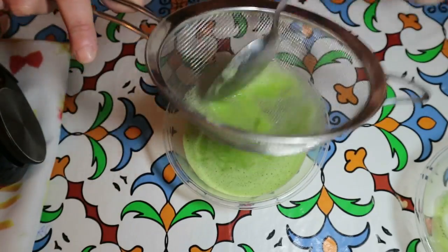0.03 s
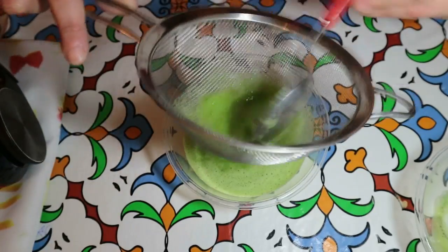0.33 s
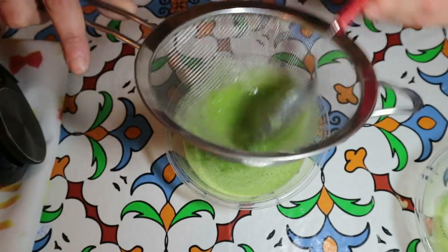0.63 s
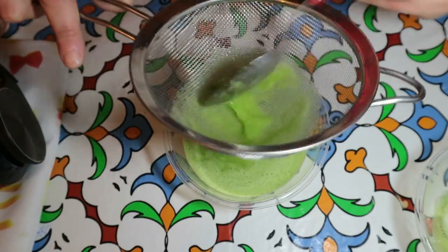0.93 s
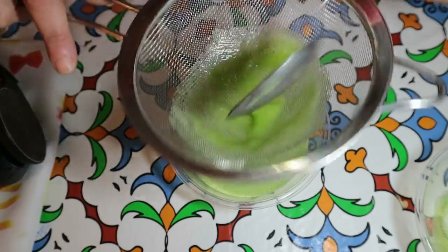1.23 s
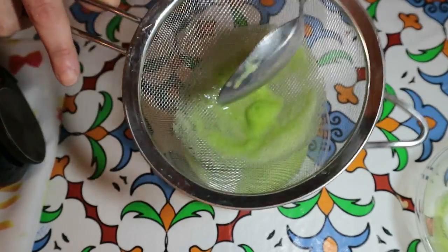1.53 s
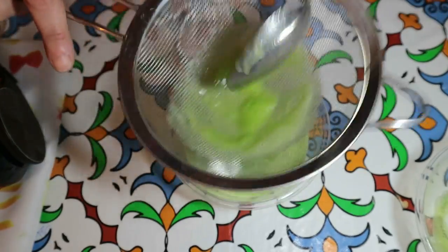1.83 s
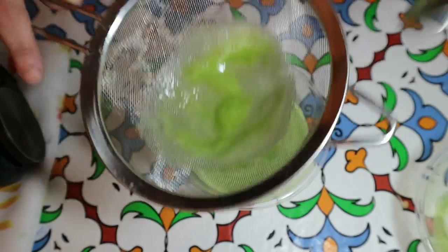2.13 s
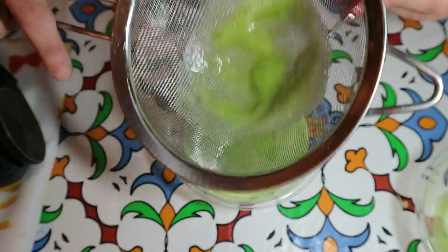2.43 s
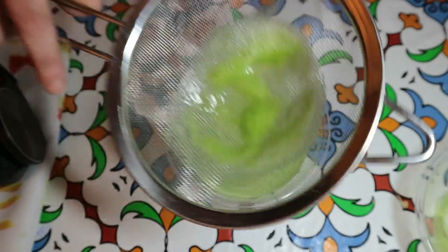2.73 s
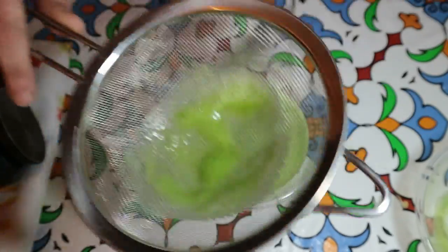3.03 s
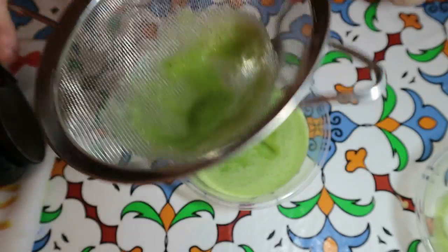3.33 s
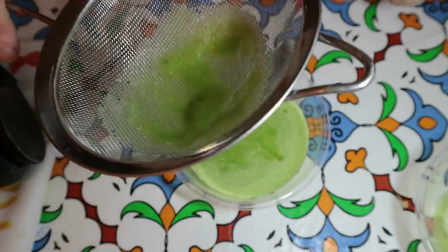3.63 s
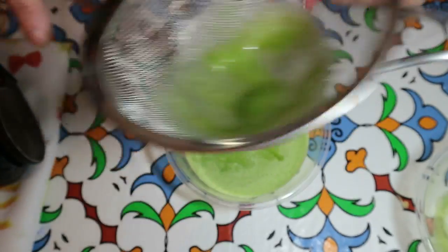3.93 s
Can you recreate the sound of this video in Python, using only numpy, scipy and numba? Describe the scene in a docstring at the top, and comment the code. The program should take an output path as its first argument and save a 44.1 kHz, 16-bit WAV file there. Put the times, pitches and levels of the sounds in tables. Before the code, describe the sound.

Close up in a small kitchen, a spoon scrapes a mesh strainer in short, zipping pushes. Four loud metal knocks follow, then a longer squeaky scrape and a few light ticks, while an appliance hums softly.

```python
"""Pushing pulp through a strainer

A metal spoon pushes wet pulp through a wire strainer in a small kitchen: quick strokes, four knocks
to shake the pulp off, then one long, squeaky scrape. The spoon's edge ticks over the wires at a rate
set by its speed and makes the mesh ring. An appliance hums; the volume dips after the knocks."""
import sys
import numpy as np
from scipy import signal
from scipy.fft import rfft, irfft
from scipy.io import wavfile
from scipy.ndimage import map_coordinates
from numba import njit

SR = 44100
rng = np.random.default_rng(int(sys.argv[2]) if len(sys.argv) > 2 else 0)


def generate_wav(sig):
    """Save sig (samples, or channels by samples) to the path in sys.argv[1] as 16-bit PCM at SR."""
    pcm = np.round(np.clip(np.atleast_2d(sig).T, -1, 1) * 32767).astype(np.int16)
    wavfile.write(sys.argv[1], SR, pcm)


N = 4 * SR
T = np.arange(N) / SR

# tone of a knock's crack, heard directly and off the walls (frequency [Hz], level [dB])
CRACK_COLOUR = [(200, -20), (800, -15), (1500, -4), (3200, 2.5), (4500, 1.5), (5600, -2), (7000, -6),
                (9400, -5), (11000, -11.5), (13000, -5), (16000, -13.5)]


def strokes():
    """Quick pushes of the spoon: pressure and speed rise and fall with each one."""
    # the pushes (fastest moment [s], rise [s], fall [s], level [dB], wires crossed [1/s])
    pushes = [(0.002, 0.015, 0.029, -17, 806), (0.113, .021, .031, -12.5, 1020),
              (0.241, .036, 0.032, -14, 1182), (0.353, 0.02, 0.029, -13.5, 900),
              (0.463, .013, 0.012, -16, 1500), (0.497, 0.015, 0.019, -25, 703.8),
              (0.577, .016, .029, -16.5, 742), (0.821, 0.0077, .014, -24.5, 804.6),
              (0.848, .011, .016, -19, 1090), (0.87, .009, 0.019, -21, 1607),
              (1.030, 0.0092, 0.011, -23.5, 1130), (1.051, 0.0099, .012, -21, 1099)]
    # the spoon lands on the mesh before a push (time [s], level [dB])
    landings = [(0.092, -35), (0.328, -20), (0.558, -18.5)]
    # ringing of the mesh and frame (frequency [Hz], width [Hz], level [dB])
    mesh_modes = [(900, 69, -9), (970, 15, -5.5), (1790, 40, 7), (1875, 70, -1.5), (2000, 30, -7),
                  (2300, 49, 0.5), (2440, 98, -1), (2688, 42, 4), (2870, 37, -3), (3154, 57, 5.5),
                  (3570, 61, 1.5), (9850, 350, -8)]
    # tone of the rubbing (frequency [Hz], level [dB])
    rub_colour = [(100, -21), (300, -9), (700, -2), (1300, -2.5), (1900, 1), (3300, -3.5), (4400, -8.5),
                  (6000, -13.5), (8000, -17.5), (9500, -18.5), (11500, -20.5), (15500, -21.5)]
    half_speed_s, landing_fade_s, rest_end_s = .034, .0076, .64
    presses = [undb(db) * bite(when, rise, fall) for when, rise, fall, db, _ in pushes]
    # the strongest push at each moment sets the speed
    peak_time, _, _, _, peak_rate = np.array(pushes)[np.argmax(presses, axis=0)].T
    speed = np.maximum(1 / (1 + ((T - peak_time) / half_speed_s) ** 2), .3)
    force, _ = rub(peak_rate * speed, spread_db=2)
    resting = undb(-34) * np.clip((rest_end_s - T) * 20, 0, 1)  # light touch between the first pushes
    landing = sum(undb(db) * (T > when) * np.exp(-np.abs(T - when) / landing_fade_s)
                  for when, db in landings)
    pressure = np.sqrt(np.sum(np.square(presses), axis=0) + resting ** 2 + landing ** 2)
    return pressure * mesh(force, mesh_modes, rub_colour)


def rub(wires_per_s, spread_db):
    """Each wire crossed gives a tick. Returns the ticks mixed with grit, and the tone of the crossings."""
    # second and third harmonic of the wire tone (level [dB])
    overtones = [-6, -8]
    grit_per_s = 3500
    crossed = np.cumsum(wires_per_s * (1 + .04 * wander(500))) / SR
    crossings = np.diff(np.floor(crossed), prepend=0)
    ticks = crossings * undb(spread_db * rng.uniform(-.95, 3.4, N)) / np.sqrt(wires_per_s)
    grit = (rng.random(N) < grit_per_s / SR) * rng.standard_normal(N)
    grit *= undb(spread_db * rng.uniform(-1.5, .8, N))
    flutter = undb(.6 * wander(210))  # the pressure shakes as the spoon catches
    force = (unit(ticks - ticks.mean()) + undb(4) * unit(grit)) * flutter
    tone = np.sin(2 * np.pi * crossed)
    for harmonic, db in enumerate(overtones, start=2):
        tone += undb(db) * wander(60) * np.sin(2 * np.pi * harmonic * crossed)
    return unit(force), np.sqrt(2) * tone


def mesh(force, modes, tint):
    """The mesh passes on all of the rubbing and also rings at a few drifting pitches."""
    shaking = undb(.5) * force + resonate(force, modes)
    return unit(colour(drifting(shaking), tint))


def zips():
    """Short gliding zips: lower ones are the spoon running over the wires, the highest the mesh ringing."""
    # (peak time [s], top pitch [Hz], level [dB], rise [s], fall [s], slide down [Hz/s])
    glides = [(0.106, 1020, -20.5, 0.0062, .007, 6000), (0.120, 1718, -18.5, 0.0061, .006, 5000),
              (0.122, 880, -19, .005, .014, 7700), (0.239, 1182, -19, 0.014, 0.025, 13170),
              (0.367, 850, -21.5, 0.0072, .014, 15660), (0.448, 820, -23.5, 0.0027, .012, 8000),
              (0.463, 1882, -17.5, 0.0051, .006, 4000), (0.467, 1510, -18, 0.0097, .004, 9967),
              (0.578, 1756, -19.5, .008, .014, 2000), (0.584, 659.5, -27.5, .004, .02, 7800),
              (0.848, 1107, -24.5, 0.0035, .007, 3000)]
    climb_hz_per_s = 20000
    jitter = 1 + .014 * wander(500)
    tones = np.zeros(N)
    for when, top_hz, db, rise, fall, slide in glides:
        slope = np.where(T < when, climb_hz_per_s, slide)
        pitch = np.maximum(top_hz - slope * np.abs(T - when), top_hz / 2)
        tones += undb(db) * bite(when, rise, fall) * sine(pitch * jitter)
    return tones


def knocks():
    """Each knock cracks, thuds and rings the rim. Returns the direct sound and what goes to the walls."""
    # knocks and small touches (time [s], level [dB], crack compared with thud [dB])
    hits = [(0.790, -19, -14), (0.816, -27, -19), (1.4092, 2, -24), (1.5582, 1.5, -3.5), (1.6994, 3, -2.5),
            (1.7066, -9, -7), (1.8431, 6, -3), (1.8499, -9, 0.5), (2.468, -12.5, -10.5), (2.482, -24, -10)]
    # the first contact and its tiny bounces (delay [s], level [dB])
    bounces = [(0, 0), (.00028, 3), (.00066, 5.5), (.0013, 0)]
    # ringing of the rim (frequency [Hz], level [dB], time to fade by 60 dB [s])
    rim_modes = [(2980, -39, .33), (3135, -40, .3)]
    # tone of the thud as it spreads to the walls (frequency [Hz], level [dB])
    thud_colour = [(200, -4), (600, 13.5), (1100, 25), (2600, 20.5), (3400, 18), (4800, 12.5), (7000, 1.5),
                   (14000, -20)]
    blows, bursts, contacts = np.zeros((3, N))
    for when, db, crack_db in hits:
        blows[int(when * SR)] = undb(db)
        bursts[int(when * SR)] = undb(db + crack_db)
        for delay, bounce_db in bounces:
            bounce_time = when + delay * rng.uniform(.8, 1.2)
            contacts[int(bounce_time * SR)] += undb(db + crack_db + bounce_db + 11)
    direct = crack(contacts, bursts) + thud(blows) + through(blows, ring(rim_modes))
    to_walls = undb(-5) * colour(blows, thud_colour) + undb(17.5) * colour(bursts, CRACK_COLOUR)
    return direct, to_walls


def crack(contacts, bursts):
    """Metal hits metal: sharp clicks and a short sizzle make the spoon ping."""
    # the spoon's ping (frequency [Hz], width [Hz], level [dB])
    ping_modes = [(3040, 190, 0), (7400, 600, -2.5), (9350, 660, 1.5)]
    sizzle = through(bursts, fade(T[:N // 10], t60_s=.01)) * rng.standard_normal(N)
    force = contacts + undb(2) * sizzle
    return colour(undb(-4) * force + resonate(force, ping_modes), CRACK_COLOUR)


def thud(blows):
    """The full strainer rings very briefly, and the table echoes it."""
    # ringing of the full strainer (frequency [Hz], level [dB], time to fade by 60 dB [s])
    strainer_modes = [(1034, -15.5, 0.026), (1280, 0, 0.007), (1528, -1, 0.007), (1953, -13.5, 0.024),
                      (2273, -5.5, 0.011), (3155, -7.5, 0.0096), (3840, -18, 0.002)]
    rise_s = .00029
    one_thud = ring(strainer_modes) * (1 - np.exp(-T[:N // 10] / rise_s))
    body = late(through(blows, one_thud), delay_s=.0004)  # the mesh gives way just after the contact
    table_echo = late(resonate(body, [(2350, 420, -3.5)]), delay_s=.00197)
    return body + table_echo


def long_scrape():
    """The spoon drags slowly over the mesh, then rubs through the wet pulp once more as it leaves."""
    # loudness of the drag and of the last rub (time [s], level [dB])
    drag_levels = [(2.47, -74), (2.525, -47.5), (2.556, -29), (2.62, -21.5), (2.656, -28), (2.70, -22),
                   (2.727, -25), (2.742, -19), (2.81, -21.5), (2.85, -48.5), (2.96, -43.5), (3.05, -62)]
    last_rub_levels = [(2.886, -48), (2.892, -31), (2.925, -30), (2.965, -50)]
    # tone of the drag and of the duller last rub (frequency [Hz], level [dB])
    drag_colour = [(100, -41), (300, -3), (550, -4), (950, -0.5), (1250, -5.5), (1600, -1), (3200, -3.5),
                   (4200, -10), (5500, -16), (8000, -19.5), (9500, -18.5), (11500, -21), (15500, -27)]
    last_rub_colour = [(300, -16), (900, 0.5), (1900, 2.5), (3600, -13), (15000, -30)]
    # speed of the spoon (time [s], wires crossed [1/s])
    speeds = [(2.54, 402.4), (2.61, 606.6), (2.66, 518.4), (2.72, 450), (2.755, 577.3), (2.775, 555.7),
              (2.8, 542.7), (2.84, 427), (2.91, 480)]
    # ringing of the mesh near the rim (frequency [Hz], width [Hz], level [dB])
    mesh_modes = [(980, 110, -5.5), (1440, 100, -3), (1770, 190, 0), (1960, 70, -12), (2400, 110, -3),
                  (2530, 150, -2.5), (2740, 110, -5), (3150, 120, -2), (3840, 91, -2)]
    force, wire_tone = rub(curve(speeds), spread_db=3.5)
    drag = swell(drag_levels) * (mesh(force, mesh_modes, drag_colour) + undb(-11) * wire_tone)
    last_rub = swell(last_rub_levels) * mesh(force, mesh_modes, last_rub_colour)
    return drag + last_rub


def squeak():
    """The spoon squeaks during the long scrape: a high, wobbly tone that comes in patches."""
    # loudness of the squeak (time [s], level [dB])
    levels = [(2.53, -56), (2.56, -39), (2.59, -26.5), (2.655, -32.5), (2.70, -30), (2.79, -35),
              (2.85, -47), (2.885, -56), (2.91, -45), (3.0, -62)]
    pitch_hz = 3213 + 58.7 * wander(110)
    patches = undb(6.5 * np.tanh(wander(130)))
    return swell(levels) * patches * sine(pitch_hz)


def lifting():
    """Soft, patchy rubbing as the strainer is lifted and tilted."""
    # loudness of the rubbing (time [s], level [dB])
    levels = [(3.05, -68), (3.17, -60.5), (3.28, -53.5), (3.40, -56.5), (3.48, -59.5), (3.56, -55),
              (3.68, -59), (3.79, -58), (3.86, -65), (3.99, -60)]
    # pitches it rings at (frequency [Hz], width [Hz], level [dB])
    modes = [(1310, 120, -8), (1770, 100, 3.5), (2160, 66, 2), (2450, 31, 7.5)]
    patches = undb(7 * np.tanh(wander(31)))
    rubbing = drifting(resonate(rng.standard_normal(N), modes))
    return swell(levels) * patches * unit(rubbing)


def light_taps():
    """Small touches make the wire frame tick and the spoon clink."""
    # touches on the frame and on the spoon (time [s], level [dB])
    frame_taps = [(0.9972, -19), (3.019, -36), (3.088, -33.5), (3.766, -40.5), (3.907, -39), (3.93, -39),
                  (3.972, -22.5)]
    spoon_taps = [(1.073, -41.5), (2.482, -40)]
    # how each rings (frequency [Hz], level [dB], time to fade by 60 dB [s])
    frame_modes = [(1810, -6, .016), (2050, -6.5, .012), (2590, -7.5, .012), (3200, -4, .012),
                   (3800, -9.5, .012), (4700, -19.5, .008), (8920, -14.5, .005)]
    spoon_modes = [(2000, 0, 0.14), (3060, 7, 0.1), (3531, -4.5, 0.15)]
    return strike(frame_taps, frame_modes) + strike(spoon_taps, spoon_modes)


def kitchen(direct, to_walls):
    """The treble reaches left and right unequally, and the walls throw the sound back."""
    # stereo width of the direct sound and of the echoes (frequency [Hz], side level [dB])
    near_width = [(100, -45), (1200, -31.5), (2400, -33.5), (4400, -12.5), (8000, -7.5), (15000, -3)]
    room_width = [(100, -19), (1300, -19.5), (2500, -12.5), (4500, -5.5), (8000, 3.5)]
    # tone of the echoes (frequency [Hz], level [dB])
    room_colour = [(200, -4.5), (1200, -4), (2800, -2), (4500, -1.5), (9000, -1.5), (11300, 3.5),
                   (12500, -7), (15000, -20)]
    scatter_s = .00085
    scatter = rng.standard_normal(N // 400) * np.exp(-T[:N // 400] / scatter_s)
    near_side = colour(through(direct, scatter / np.linalg.norm(scatter)), near_width)
    sent = undb(-10) * colour(to_walls, room_colour)
    room_mid = through(sent, room_echo())
    room_side = colour(through(sent, room_echo()), room_width)
    return stereo(direct, near_side) + stereo(room_mid, room_side)


def room_echo():
    """The kitchen's answer to one click: octave bands of noise, each fading at its own pace."""
    # how long the room rings (frequency [Hz], time to fade by 60 dB [s])
    fade_times = [(300, 0.72), (1500, 0.39), (4000, 0.45), (8000, 0.41), (15000, 0.06)]
    onset_s = .00057
    t = T[:N // 8]
    hz = np.arange(len(t) // 2 + 1) * SR / len(t)
    spectrum = rfft(rng.standard_normal(len(t)))
    tail = np.zeros(len(t))
    for centre in 125 * 2 ** np.arange(8):
        band = np.maximum(1 - np.abs(np.log2((hz + 1) / centre)), 0)
        tail += irfft(spectrum * band, len(t)) * fade(t, at_frequency(fade_times, centre))
    tail *= np.clip(t / onset_s - 1, 0, 1)
    return tail / np.linalg.norm(tail)


def appliance_hum():
    """An appliance hums in a few low tones that slowly waver."""
    # the tones (frequency [Hz], level [dB], waver [dB])
    tones = [(49.7, -61, 1), (75.1, -52, 5), (98, -51, 1.5), (149, -43.5, 6), (244.6, -38, 3),
             (481.3, -50, 4)]
    # slow swell of the whole hum (time [s], level [dB])
    levels = [(0, 0.5), (.6, 1.5), (1.1, 1), (1.9, 0), (2.6, 2), (3.25, 0), (3.55, .5), (4, -5)]
    hum = np.zeros(N)
    for hz, db, waver_db in tones:
        gain = undb(db + waver_db * np.tanh(wander(6.02)))
        hum += gain * np.sqrt(2) * np.sin(2 * np.pi * hz * T + .3 * wander(4.88))
    hum *= undb(curve(levels))
    return stereo(hum, undb(-32) * hum)


def room_air():
    """A dull, steady rush of air fills the room."""
    # tone of the rush (frequency [Hz], level [dB])
    air_colour = [(20, -19.5), (40, -10), (70, -8), (130, 0.5), (210, 2.5), (330, -5), (520, -3.5),
                  (800, -11), (1500, -18), (2600, -25), (4500, -33), (9000, -41.5), (12000, -53),
                  (16000, -65)]
    # its stereo width (frequency [Hz], side level [dB])
    air_width = [(50, -33), (150, -19), (350, -11.5), (900, -10.5), (3000, 3.5), (8000, 7)]
    mid, side = (undb(-37.5) * unit(colour(rng.standard_normal(N), air_colour)) for _ in range(2))
    return stereo(mid, colour(side, air_width))


def undb(db):
    """Turn decibels into a gain."""
    return 10 ** (np.asarray(db) / 20)


def unit(x):
    """Scale a sound to an average (rms) level of 1."""
    return x / np.sqrt(np.mean(x ** 2))


def curve(rows):
    """Join (time, value) points with straight lines."""
    return np.interp(T, *np.array(rows).T)


def swell(rows):
    """A gain that follows (time [s], level [dB]) points and is zero outside them."""
    return undb(curve(rows)) * (T > rows[0][0]) * (T < rows[-1][0])


def bite(when, rise, fall):
    """Loudness of one push: the spoon bites quickly and eases off slowly."""
    distance = np.abs(T - when) / np.where(T < when, rise, fall)
    steepness = np.where(T < when, 2.2, 1.4)
    return np.exp(-np.minimum(distance, 10) ** steepness)


def fade(t, t60_s):
    """A gain that drops by 60 dB every t60_s seconds."""
    return np.exp(-np.log(1000) * t / t60_s)


def wander(per_s):
    """A smooth random wiggle, roughly 1 in size, through per_s points a second."""
    points = rng.standard_normal(N // 10)
    return map_coordinates(points, [T * per_s + 2], order=2, mode="wrap")


def drifting(x):
    """Let all the pitches in a sound wander a little."""
    return map_coordinates(x, [np.cumsum(1 + .008 * wander(25))], order=2, mode="mirror")


def sine(hz):
    """A pure tone with rms level 1 that follows a changing pitch."""
    return np.sqrt(2) * np.sin(2 * np.pi * np.cumsum(hz) / SR)


def ring(modes):
    """A struck object's sound: pure tones that fade away."""
    t = T[:N // 10]
    return sum(undb(db) * np.sin(2 * np.pi * hz * t) * fade(t, t60) for hz, db, t60 in modes)


def strike(taps, modes):
    """Start the same ring at each tap."""
    hits = np.zeros(N)
    for when, db in taps:
        hits[int(when * SR)] = undb(db)
    return through(hits, ring(modes))


def resonate(x, modes):
    """Pick out ringing bands of a sound (frequency [Hz], width [Hz], level [dB])."""
    return sum(undb(db) * signal.lfilter(*signal.iirpeak(hz, hz / width, fs=SR), x)
               for hz, width, db in modes)


def at_frequency(rows, hz):
    """Read between (frequency, value) points, with octaves evenly spaced."""
    frequencies, values = np.array(rows).T
    return np.interp(np.log(np.maximum(hz, 1)), np.log(frequencies), values)


def colour(x, rows):
    """Shape a sound's tone along (frequency [Hz], level [dB]) points."""
    gains = undb(at_frequency(rows, np.arange(N // 2 + 1) * SR / N))
    cepstrum = irfft(np.log(gains))
    # fold it so that the filter never answers before the sound arrives
    cepstrum[1:N // 2] *= 2
    cepstrum[N // 2 + 1:] = 0
    response = irfft(np.exp(rfft(cepstrum)))
    return through(x, response[:N // 20])


def through(x, response):
    """Let every sample set off a copy of the response (convolution)."""
    return signal.fftconvolve(x, response)[:N]


def late(x, delay_s):
    """Delay a sound."""
    return np.interp(T - delay_s, T, x, left=0)


def stereo(mid, side):
    """Make left and right from their shared part (mid) and their opposite part (side)."""
    return np.array([mid + side, mid - side])


@njit
def follow(x, attack, release):
    """Track a level, rising at the attack rate and falling at the release rate."""
    levels, level = np.empty(len(x)), 0.
    for i in range(len(x)):
        level += (x[i] - level) * (attack if x[i] > level else release)
        levels[i] = level
    return levels


def scene():
    """Spoon and strainer in the humming kitchen."""
    handling = strokes() + zips() + long_scrape() + squeak() + lifting() + light_taps()
    direct, to_walls = knocks()
    return kitchen(handling + direct, handling + to_walls) + appliance_hum() + room_air()


def record(dry):
    """Automatic volume control dips after loud sounds; peaks are rounded and the highest treble is cut."""
    attack_s, release_s = .0027, .75
    threshold, ceiling, top_hz = .4, .71, 16000
    loudness = follow(np.abs(dry).max(axis=0), 1 / (attack_s * SR), 1 / (release_s * SR))
    ducked = dry / np.maximum(loudness / threshold, 1)
    rounded = ceiling * np.tanh(ducked / ceiling)
    return signal.sosfilt(signal.ellip(8, .2, 70, top_hz, fs=SR, output="sos"), rounded)


dry = scene()
out = record(dry)
generate_wav(out)
```